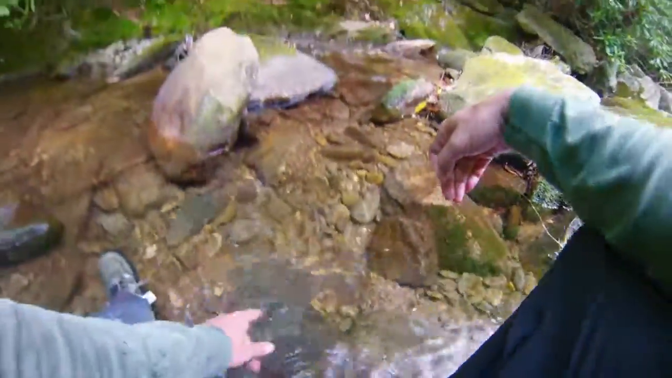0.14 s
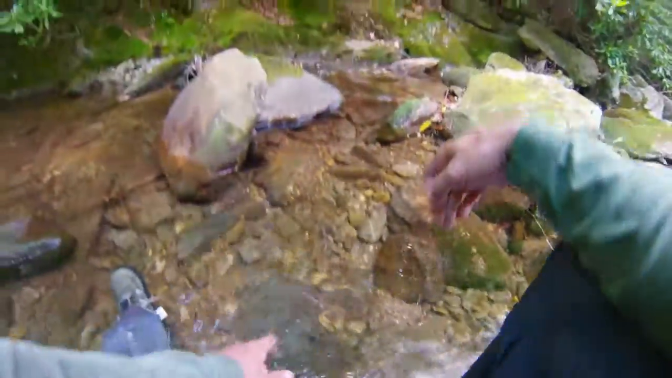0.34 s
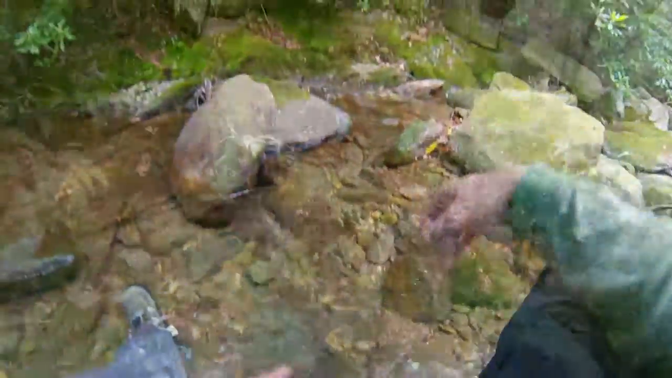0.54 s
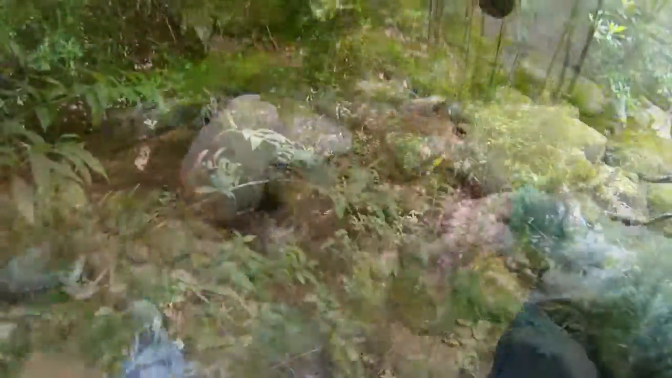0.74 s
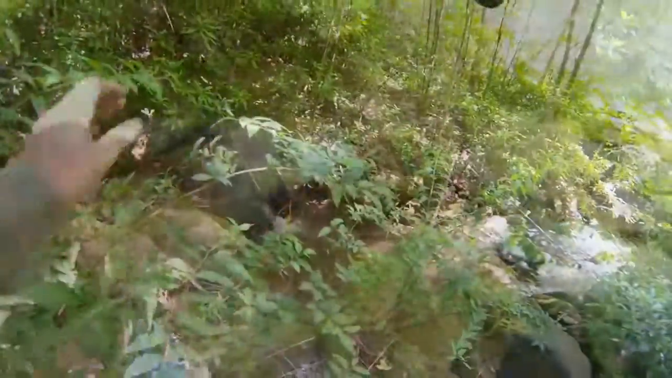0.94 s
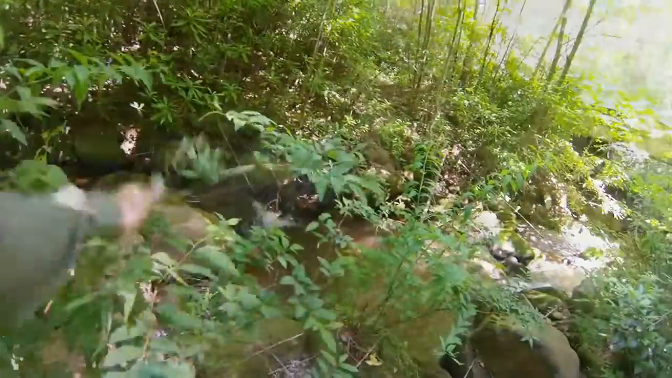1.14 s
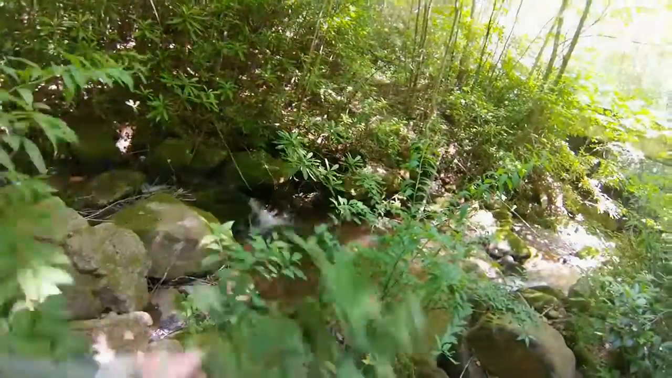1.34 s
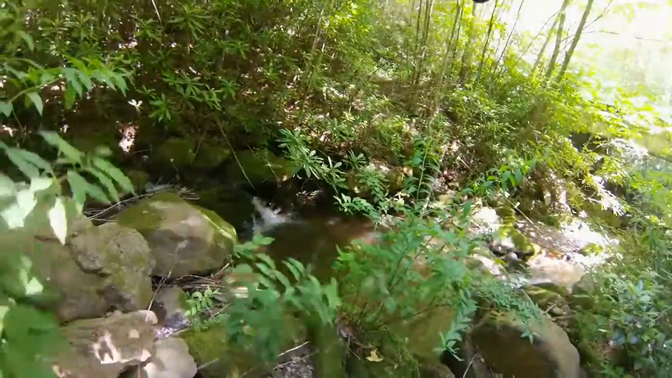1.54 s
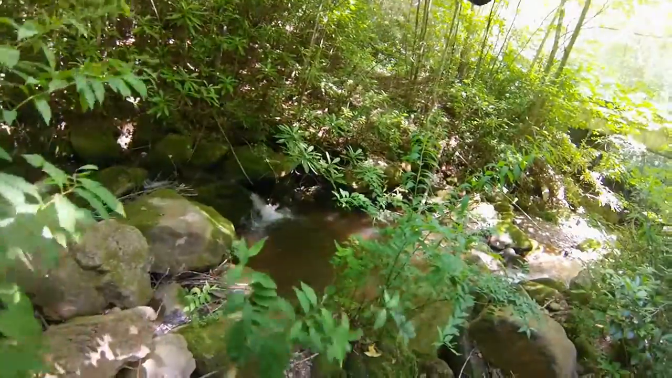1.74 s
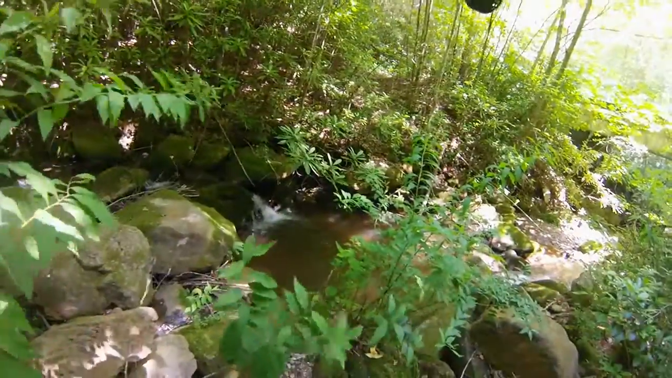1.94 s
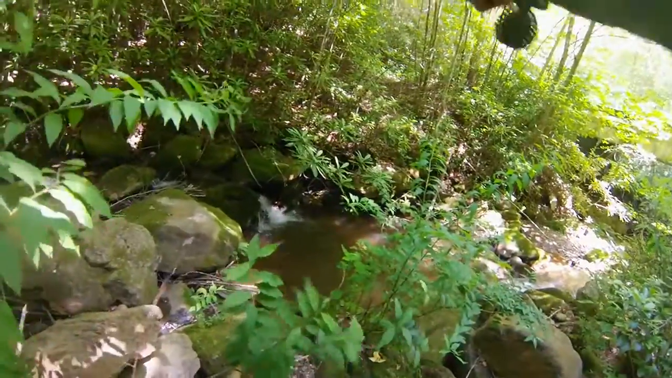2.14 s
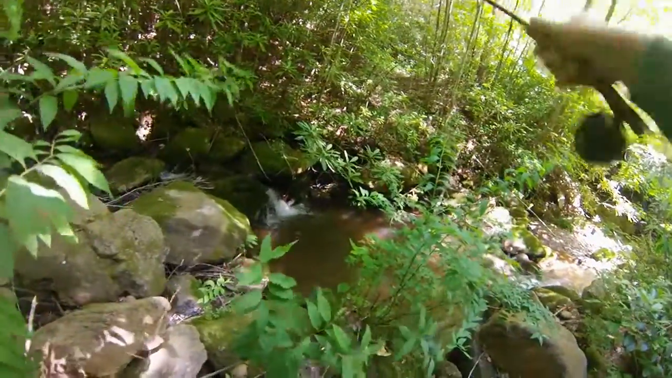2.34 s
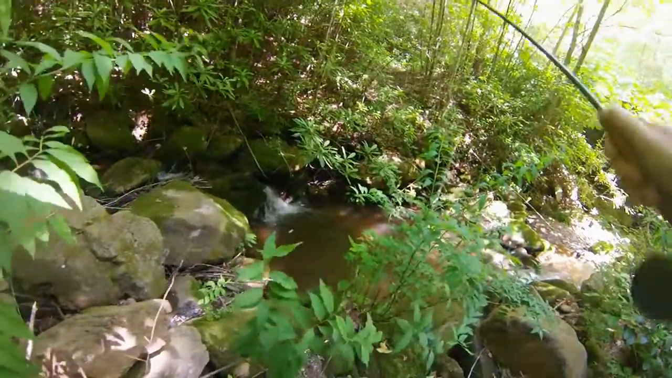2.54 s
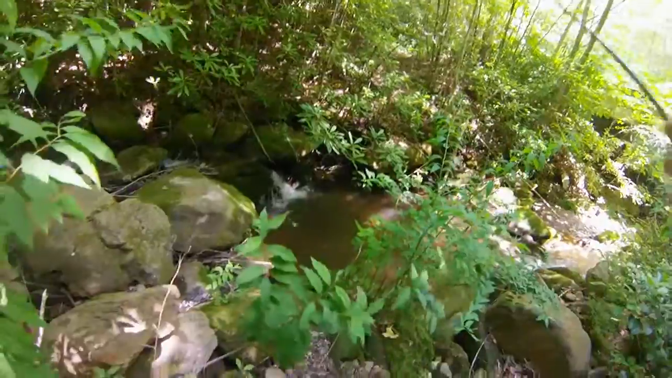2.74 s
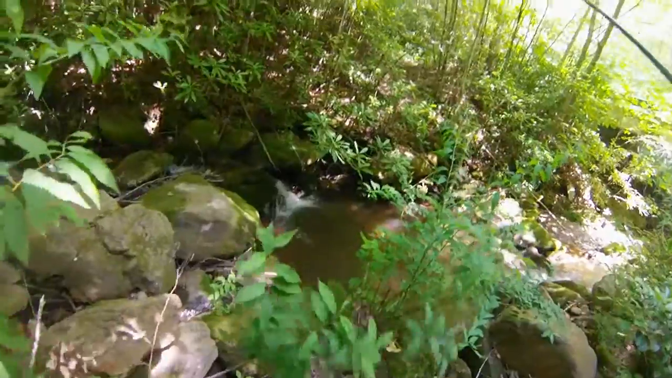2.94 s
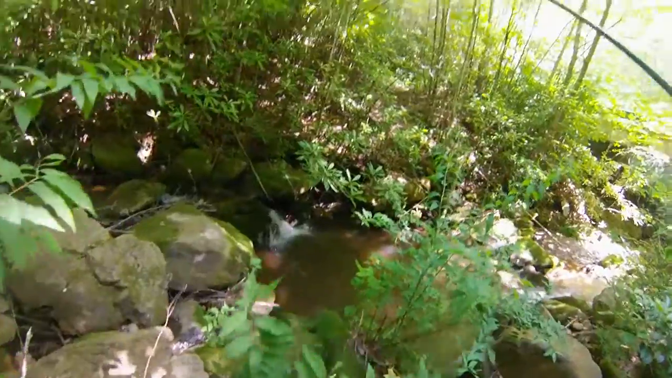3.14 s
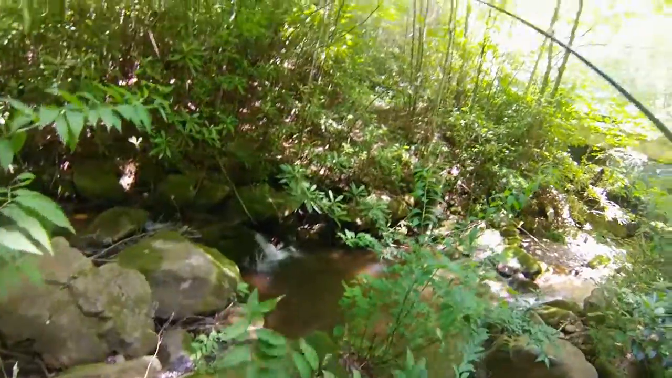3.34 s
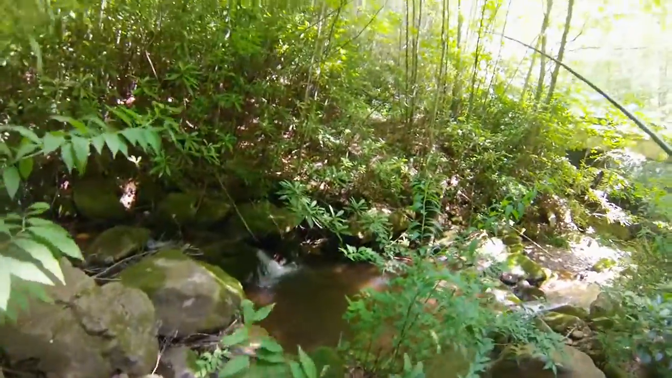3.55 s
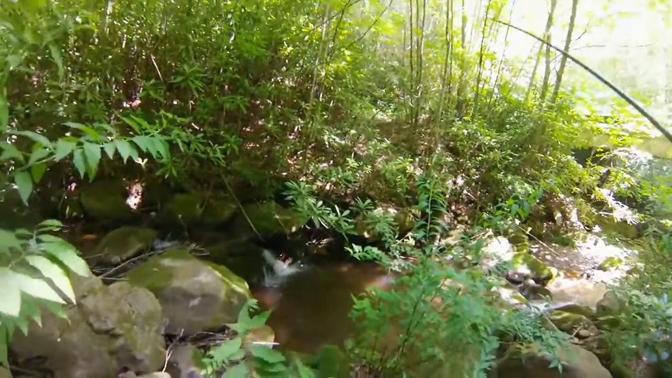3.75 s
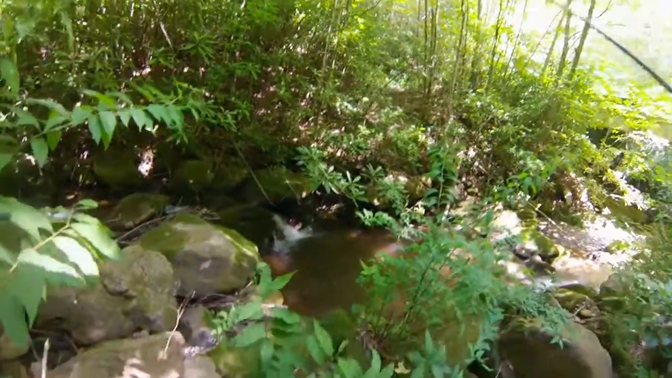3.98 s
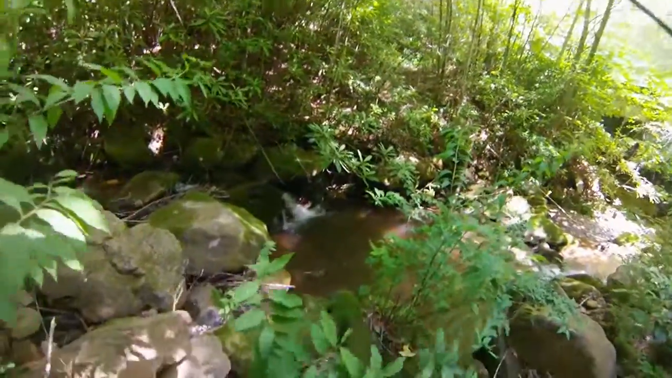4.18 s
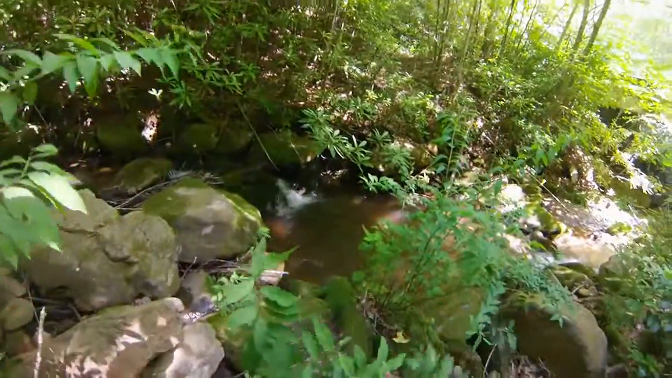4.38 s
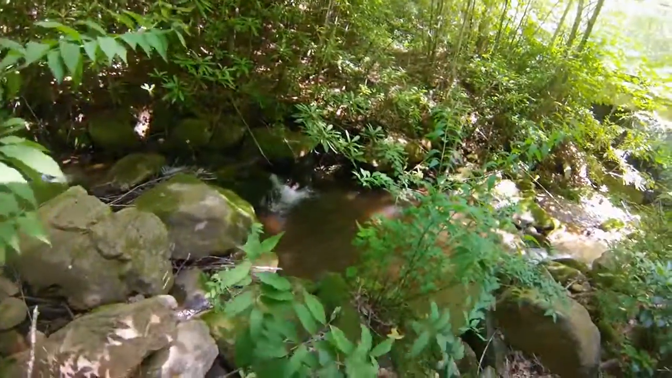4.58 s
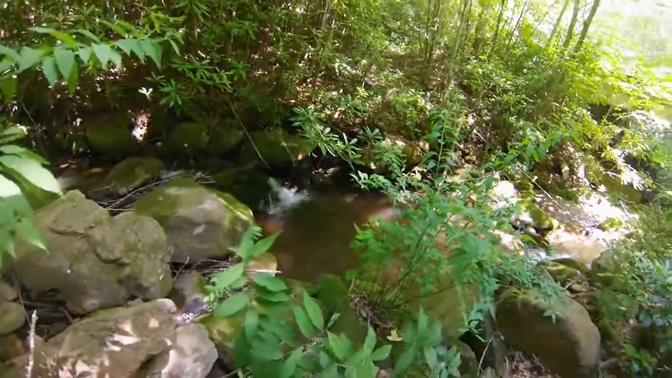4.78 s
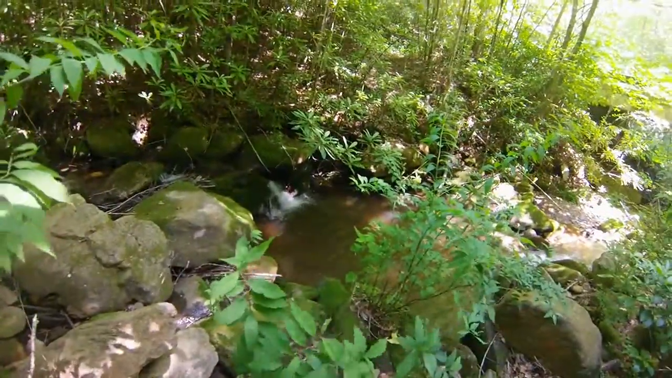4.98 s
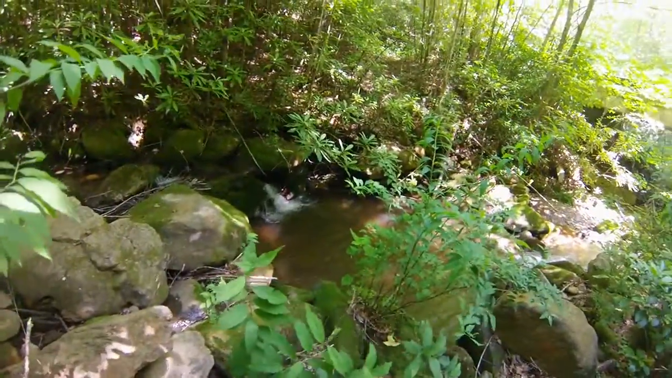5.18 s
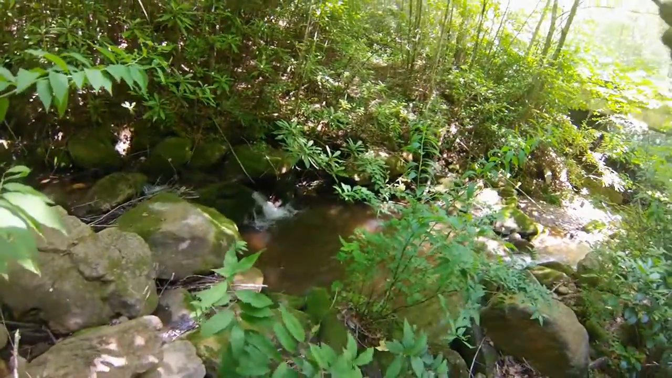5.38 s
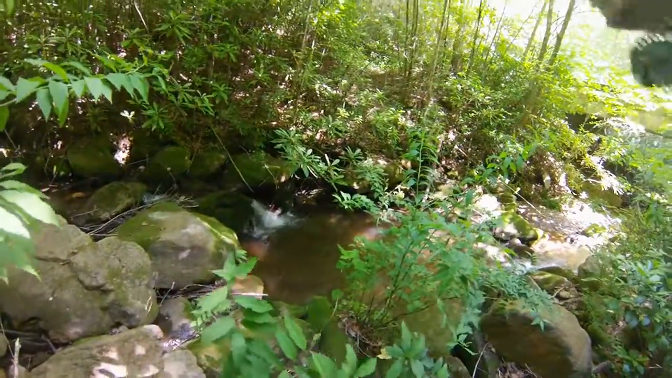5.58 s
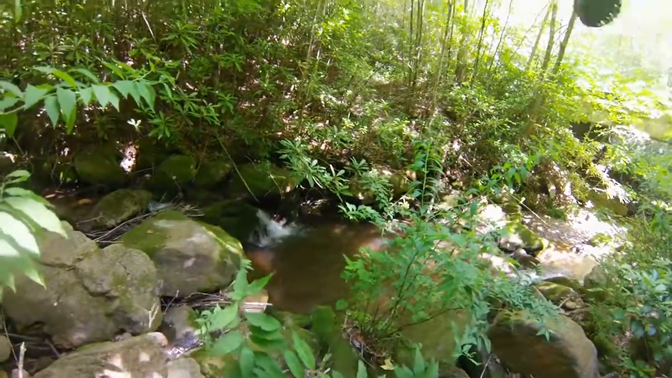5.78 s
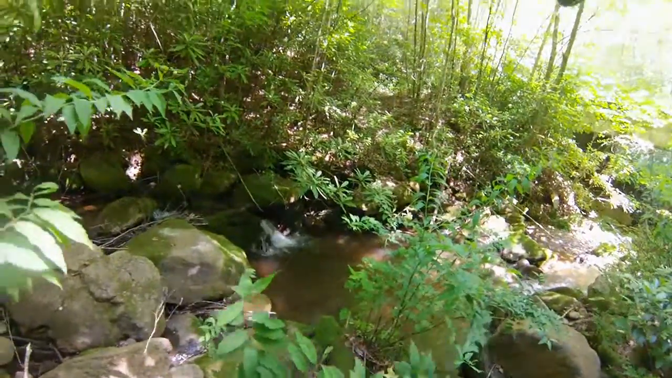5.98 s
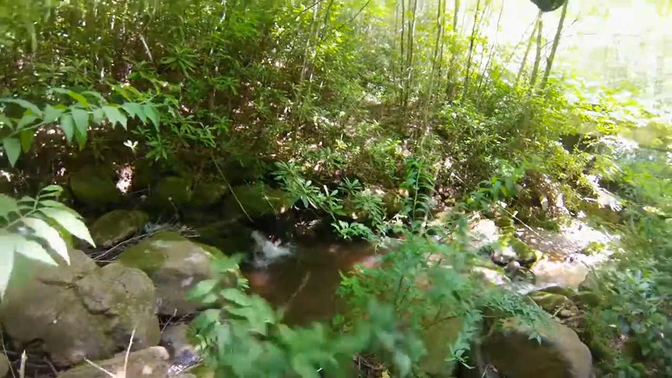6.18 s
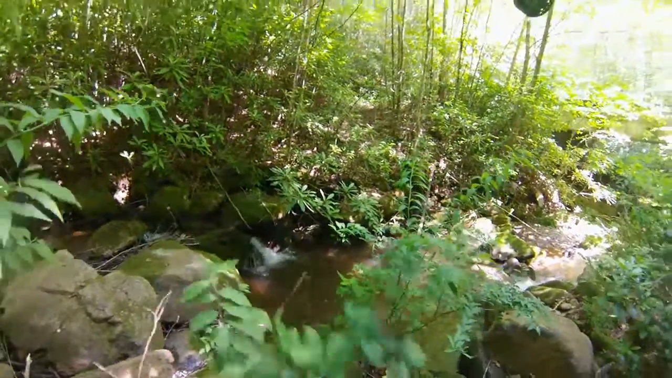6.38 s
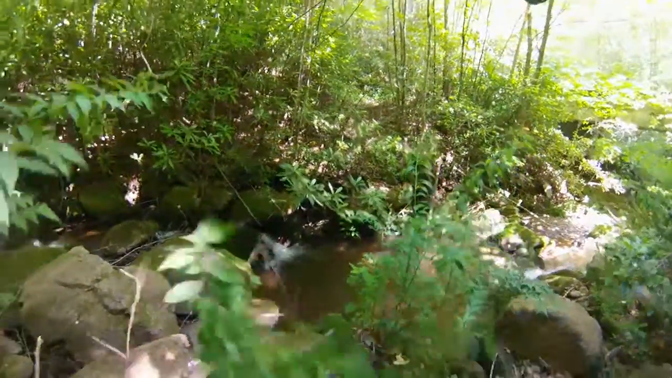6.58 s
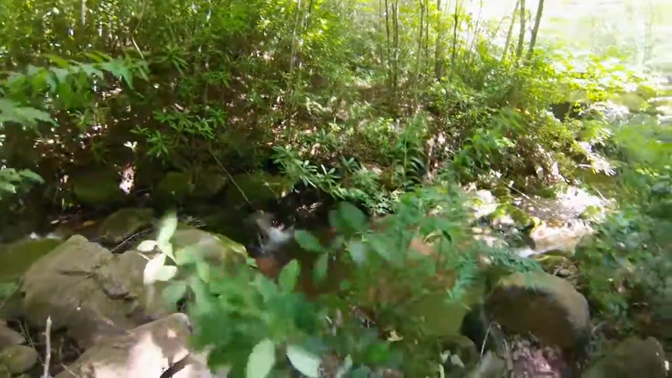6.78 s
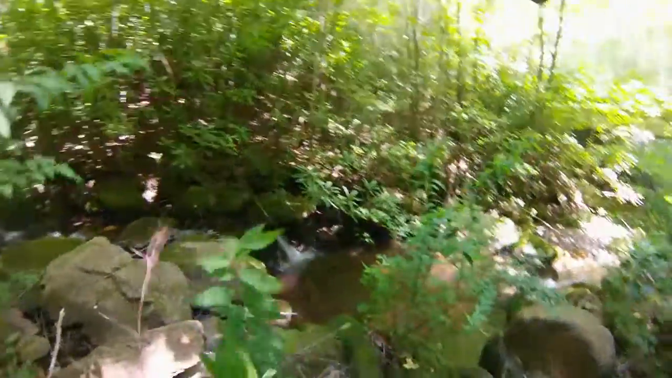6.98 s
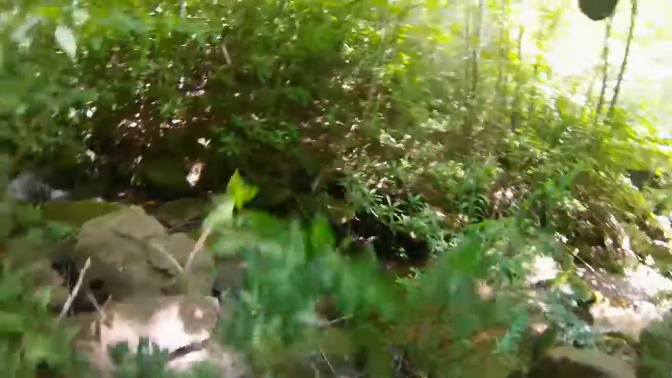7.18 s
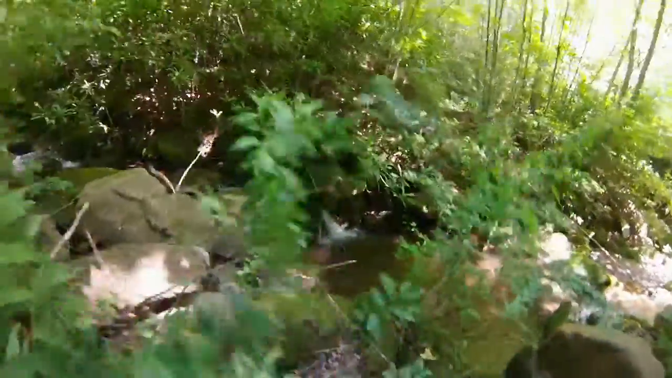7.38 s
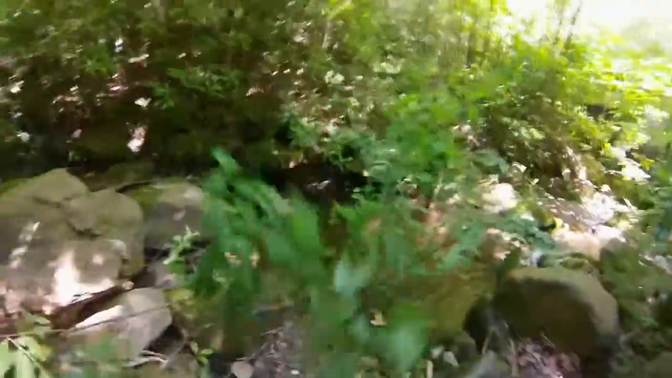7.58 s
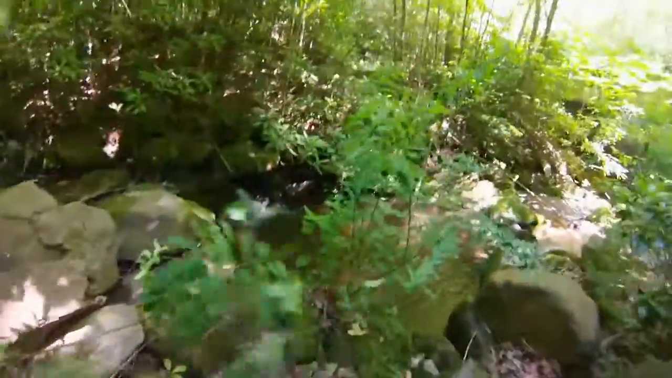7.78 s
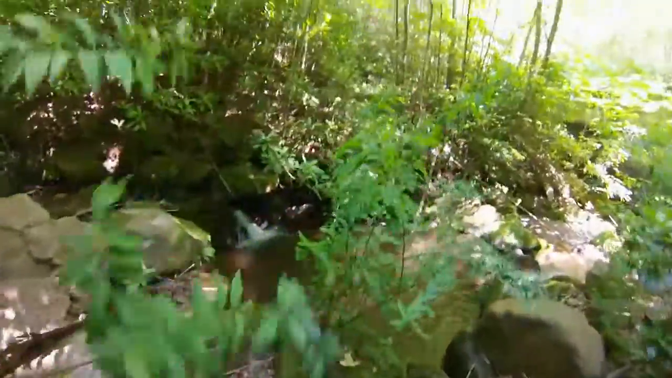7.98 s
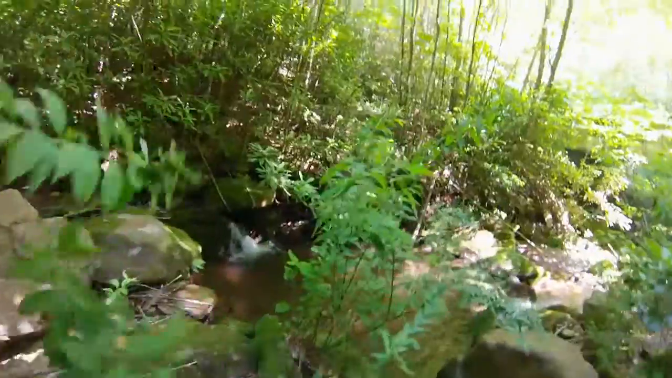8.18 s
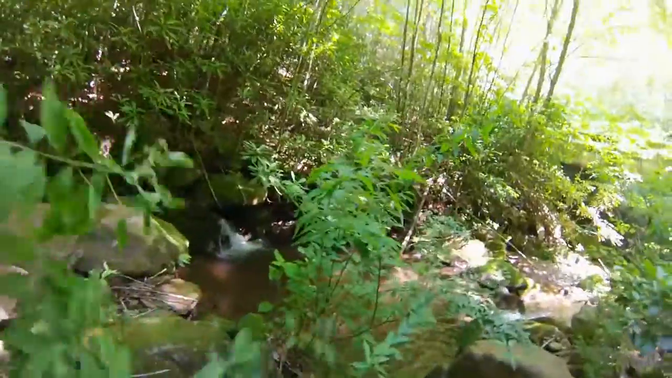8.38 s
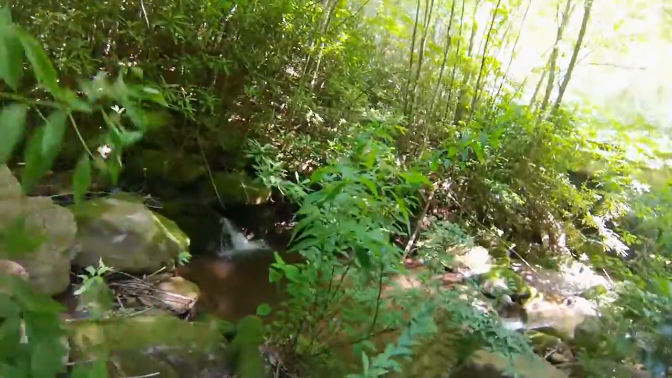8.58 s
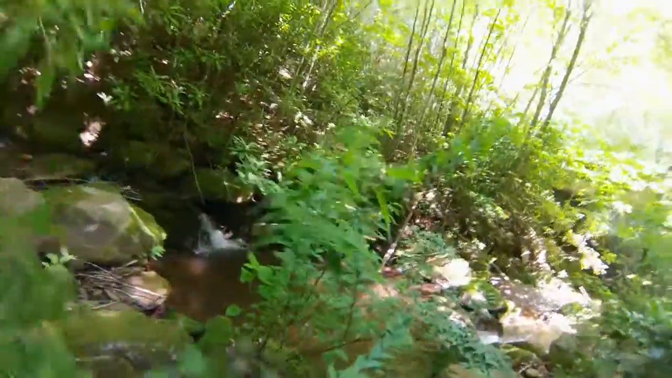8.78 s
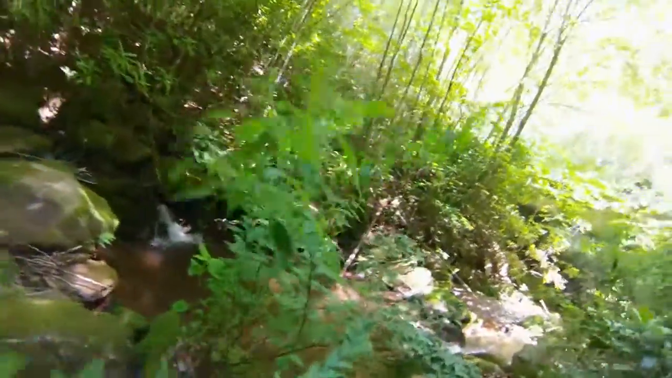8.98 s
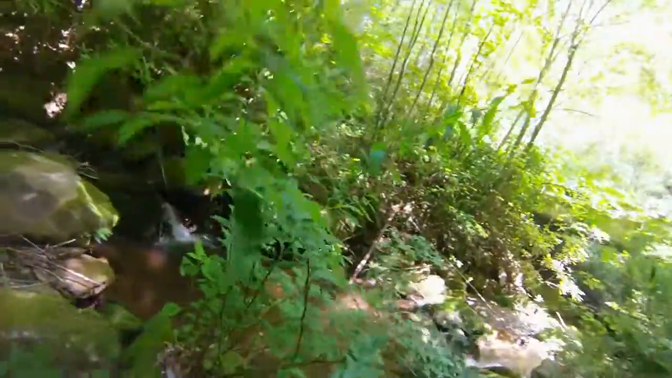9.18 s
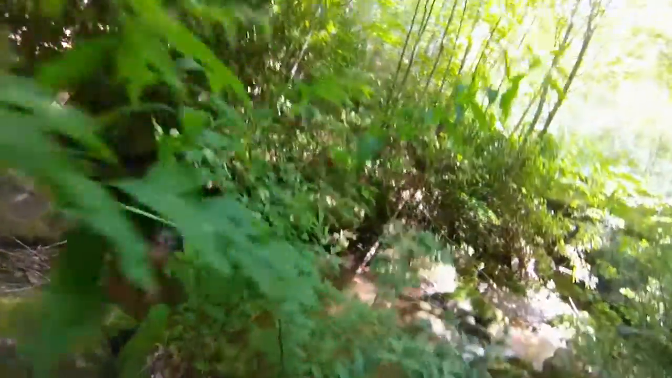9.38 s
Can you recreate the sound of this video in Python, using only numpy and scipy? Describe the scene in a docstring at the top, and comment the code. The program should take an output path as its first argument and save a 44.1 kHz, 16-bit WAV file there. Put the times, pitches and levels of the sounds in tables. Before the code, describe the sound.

At first only a faint shallow trickle is heard, with a cloth rub and small dull taps at the microphone. From about 0.5 to 1.4 seconds a small cascade fades in and then pours steadily into a rock pool, bubbly and slightly hollow, with fine spray. Raspy fabric strokes and thuds cluster from 1.5 to 3.5 seconds, with tiny dry ticks. Deep soft jolts follow around 3.7 to 5.2, with a rumble swell near 4 and sleeve brushes at 4 and 5.4. It is calmer until 6.4, when a few taps return. Around 7 to 7.6 cloth swishes and a heavy low surge peaks, then eases. Light taps come near 8; at 9.1 a firm dry knock and swish, then rubbing and rumble as it ends. Barely audible high insect chirps appear occasionally. The sound is close, mono, outdoors.

```python
"""Small mountain stream: a steady shallow trickle, joined within 1.4 s by a cascade pouring into a rock pool.
Water is shaped noise plus ringing bubbles, coloured by the resonances of a body-worn microphone case.
The wearer moves: cloth rubs, rasps and swishes; taps, jolts and air hit the case; twigs and gear tick.
These are shaped noise bursts and damped swings. A faint insect chirps in narrow-band noise."""
import sys
import numpy as np
from scipy import signal
from scipy.fft import rfft, irfft, next_fast_len
from scipy.io import wavfile
from scipy.ndimage import map_coordinates

SR = 44100
rng = np.random.default_rng(int(sys.argv[2]) if len(sys.argv) > 2 else 0)


def to_wav(s):
    """Save 16-bit WAV."""
    ch = np.atleast_2d(s).T  # columns
    pcm = np.round(np.clip(ch, -1, 1) * 32767)  # PCM
    wavfile.write(sys.argv[1], SR, pcm.astype(np.int16))


N = 415863

# Reference level of the cascade flow: [t/s, level/dB]
CASCADE_FLOW = [(.3, -66.5), (.5, -63.5), (1.05, -54), (1.4, -52), (9.43, -51.5)]
# Scraping strokes: [centre t/s, length/s, rasp level/dB, swish level/dB]
SCRAPE_STROKES = [(0.03, 0.45, -79, -65), (1.61, 0.14, -51, -59), (1.935, 0.087, -56.5, -64),
                  (2.31, 0.17, -54, -58.5), (2.49, .16, -61, -64), (3.14, 0.36, -63, -54.5),
                  (3.45, 0.18, -61.5, -59), (7.056, 0.19, -62, -56.5), (7.24, 0.11, -62, -61),
                  (7.483, 0.17, -56.5, -54.5), (9.119, 0.045, -62, -49.5), (9.3, 0.4, -60.5, -59.5)]
# Soft sleeve brushes: [centre t/s, length/s, level/dB]
SLEEVE_BRUSHES = [(0.177, 0.2, -55.5), (3.98, 0.093, -49), (4.089, 0.033, -43), (5.307, 0.11, -44.5),
                  (5.41, 0.18, -46), (5.583, 0.061, -47.5), (8.254, 0.32, -55), (9.351, 0.062, -43)]
# Taps on the case: [t/s, peak swing level/dB]
CASE_TAPS = [(0.162, -33), (0.181, -39), (0.434, -39), (1.337, -33.5), (1.404, -33.5), (1.678, -27.5),
             (1.816, -35.5), (2.282, -32), (2.358, -31), (2.378, -36), (2.768, -32), (2.781, -31),
             (3.323, -31), (3.357, -31.5), (3.616, -31.5), (4.16, -29.5), (4.520, -35.5), (4.683, -36),
             (4.795, -33.5), (4.94, -31.5), (5.040, -30.5), (6.442, -30), (6.557, -38), (7.882, -29.5),
             (8.054, -31), (9.068, -29.5)]
# Slow jolts of the body: [centre t/s, peak level/dB]
BODY_JOLTS = [(0.221, -34.5), (1.36, -42), (1.831, -32), (2.36, -30), (3.25, -27.5), (3.713, -24.5),
              (4.193, -22.5), (4.67, -24), (5.148, -30.5), (5.65, -35), (6.61, -31), (7.09, -25.5),
              (7.451, -25), (8.5, -31)]
# Ticks of twigs and gear: [t/s, peak level/dB, centre f/Hz, half-width/octaves, t60/s]
DRY_TICKS = [(1.600, -44, 2260, 0.12, 0.043), (2.031, -45, 6030, 0.21, 0.099),
             (2.083, -41, 2060, 0.084, 0.026), (2.377, -37, 1100, 0.62, 0.016),
             (2.770, -34.5, 2200, 0.17, 0.019), (2.823, -52, 5400, .08, .025), (3.055, -45, 6800, .17, .03),
             (5.067, -51, 5370, .1, .03), (6.704, -45, 6000, 0.93, 0.025), (7.770, -53, 10800, 0.09, .02),
             (8.056, -41, 1150, 0.72, .018), (9.068, -25.5, 650, 1.22, 0.02),
             (9.068, -45, 2600, 0.92, 0.0082)]
# Insect chirps: [centre t/s, level/dB]
INSECT_CHIRPS = [(.52, -75), (2.49, -72), (4.89, -70), (6.36, -68), (8.07, -71)]
# Case resonances: [centre f/Hz, Gaussian width/Hz, peak level/dB]
CASE_RESONANCES = [(561.5, 10, 5), (724, 44, 2.5), (1398, 160, 13), (2176, 109, 8.5), (2589, 115, 6),
                   (3877, 190, 4.5), (5380, 275, 6), (6240, 230, 4), (10030, 210, 2), (11260, 330, 5)]
# Cloth drags across the case: [start t/s, length/s, level/dB]
CLOTH_DRAGS = [(0.028, 0.19, -47.5), (0.572, 0.032, -50.5), (1.129, 0.17, -46.5), (1.515, 0.066, -45.5),
               (1.592, .08, -41.5), (1.875, 0.31, -47), (2.24, 0.29, -40.5), (2.54, 0.043, -43.5),
               (2.76, 0.041, -42.5), (2.878, 0.17, -46.5), (3.043, 0.33, -44.5), (3.43, 0.12, -47),
               (3.84, 0.16, -51), (5.304, 0.21, -45), (5.57, 0.057, -53.5), (6.251, .1, -47.5),
               (6.89, 0.17, -50.5), (7.186, 0.097, -43.5), (7.428, 0.13, -42), (7.616, 0.12, -48.5),
               (7.86, .08, -49.5), (8.103, 0.25, -46), (8.763, 0.47, -49.5), (9.08, 0.21, -50),
               (9.323, 0.071, -37)]
# Wearer's motion as slow pressure on the port: [t/s, level/dB]
BODY_MOTION = [(0, -44.5), (2.1, -48.5), (2.4, -39), (3.7, -40), (4.05, -29), (4.45, -42), (6.1, -44),
               (6.8, -29.5), (7.35, -25.5), (7.55, -17), (7.85, -38.5), (8.5, -37), (9.27, -25),
               (9.43, -25.5)]

# Spectral shapes ahead of the case, all [f/Hz, relative level/dB per Hz]
# Cascade body
POUR_SPECTRUM = [(40, -2), (200, 1.5), (400, -3.5), (620, -11), (950, -1.5), (1200, -1), (1550, -0.5),
                 (1800, -5), (2600, -8.5), (3400, -13), (6000, -32), (15000, -63)]
# Cascade spray
SPRAY_SPECTRUM = [(1000, -55), (2400, 3), (3300, -8), (4500, 0), (7200, 1.5), (8200, -4.5), (9300, -8),
                  (11500, -7.5), (13000, -11), (15300, -20.5)]
# Shallow run
SHALLOWS_SPECTRUM = [(60, -3.5), (400, 5), (900, -3), (1150, 1), (1420, -21), (1800, -5.5), (2200, -6),
                     (3200, -8.5), (4500, -10.5), (5400, -13.5), (7500, -11.5), (11300, -16), (15000, -17)]
# Air rumble at the port
AIR_SPECTRUM = [(15, -13), (30, 7.5), (42, -9), (60, -7), (100, -22), (300, -53), (1000, -83)]
# Slow heave of pressure
HEAVE_SPECTRUM = [(5, -8), (10, 0), (15, 0), (22, -8), (32, -24), (60, -48), (200, -95)]
# Low cloth rub
RUB_SPECTRUM = [(25, -3), (60, -1.5), (90, -1.5), (140, 1), (200, -9), (270, -13), (370, -23.5), (700, -33),
                (1500, -48), (5000, -71)]
# Rasp of a stroke
RASP_SPECTRUM = [(100, -24), (330, 3.5), (600, -4.5), (760, 0), (1000, -7), (1400, -24), (2500, -20),
                 (6000, -38), (15000, -44)]
# Swish of a stroke
SWISH_SPECTRUM = [(500, -37), (1400, -3.5), (2000, 9), (2800, -2), (4000, -9.5), (7000, -12), (15000, -39)]
# Soft sleeve
SLEEVE_SPECTRUM = [(60, -14), (150, -2.5), (250, 6.5), (310, -6), (400, -23), (1200, -58), (4000, -74)]

EASY_MOTION_DB = -39.5  # an easy shift of weight
AIR_DB, AIR_GROWTH_DB_PER_DB = -52.5, 0.5  # air rumble at easy motion; growth with motion
CREEP_DB, CREEP_GROWTH_DB_PER_DB = -58, 0.1  # cloth creeping between drags, likewise
GRIP_S, RELEASE_S = 0.021, 0.04  # a drag takes hold and lets go
PUFF_DB = -8.5  # air pushed by a drag, relative to its rub
TOP_HZ = 15290
TIME_S = np.arange(N) / SR


def amp(db):
    """Decibels to gain."""
    return 10 ** (np.asarray(db) / 20)


def unit(x):
    """Scale to rms 1."""
    return x / np.sqrt(np.mean(x ** 2) + 1e-20)


def noise():
    """White noise at nominal rms 1."""
    return rng.standard_normal(N)


def curve(rows):
    """Interpolate (s, value) rows to one value per sample."""
    return np.interp(TIME_S, *np.transpose(rows))


def wobble(knots_per_s):
    """Smooth random curve through normal-distributed knots."""
    knots = rng.standard_normal(int(N * knots_per_s / SR) + 4)
    return map_coordinates(knots, [np.arange(N) * knots_per_s / SR])


def swell(centre_s, length_s):
    """Bell-shaped envelope, length_s wide at 1/e."""
    return np.exp(-np.minimum((2 * (TIME_S - centre_s) / length_s) ** 2, 50))


def swells(rows):
    """Sum of bells from (centre s, length s, dB) rows."""
    return sum(amp(db) * swell(s, length_s) for s, length_s, db in rows)


def add(track, start_s, sound):
    """Mix a sound into the track in place."""
    part = track[max(round(start_s * SR), 0):][:len(sound)]
    part += sound[:len(part)]


def filtered(x, response):
    """Apply a gain that is a function of frequency."""
    size = next_fast_len(N + SR // 4)  # padded against wrap-around
    return irfft(rfft(x, size) * response(np.fft.rfftfreq(size, 1 / SR)), size)[:N]


def encased(x, spectrum):
    """Shape x by its own spectrum and the case's resonant peaks, at rms 1."""
    f_hz, level_db = np.transpose(spectrum)

    def response(hz):
        total_db = np.interp(np.log(hz + 1), np.log(f_hz), level_db)
        for centre_hz, width_hz, peak_db in CASE_RESONANCES:
            total_db = total_db + peak_db * np.exp(-0.5 * ((hz - centre_hz) / width_hz) ** 2)
        return amp(total_db)

    return unit(filtered(x, response))


def bubbles(per_s, low_hz, high_hz, cycles, spread_db, rise, samples):
    """Bubbles ring briefly, rising in pitch as they near the surface; a few are much stronger."""
    draws = rng.random((int(per_s * N / SR), 4))
    when, pitch, strength, life = draws.T[:, :, None]
    hz = low_hz * (high_hz / low_hz) ** pitch
    t = np.arange(samples) / SR
    age = t * hz / (cycles * (0.5 + life))  # in lifetimes
    ring = np.sin(2 * np.pi * hz * t * (1 + rise * np.minimum(age, 2) / 2))
    strength_db = spread_db * np.minimum(-np.log(1 - strength), 4.5)
    gain = amp(strength_db) * np.sqrt(hz / low_hz)
    decaying = gain * ring * np.exp(-np.pi * age)
    where = (when * N).astype(int) + np.arange(samples)
    return unit(np.bincount(where.ravel(), decaying.ravel(), N)[:N])


def stream():
    """Cascade body and spray share a surge of flow; a thin trickle runs beneath at constant level."""
    gurgle = bubbles(per_s=330, low_hz=439.6, high_hz=3305, cycles=16.2, spread_db=2.5, rise=0.15,
                     samples=1300)
    droplets = bubbles(per_s=1200, low_hz=2680, high_hz=13900, cycles=22, spread_db=2.5, rise=0.057,
                       samples=260)
    trickle = bubbles(per_s=260, low_hz=726, high_hz=8760, cycles=14, spread_db=1.5, rise=0.14,
                      samples=700)
    surge = wobble(7)  # more water: louder body and spray alike
    flow_db = curve(CASCADE_FLOW)
    body_db = flow_db + 0.4 + 0.53 * surge + 0.17 * wobble(24)
    spray_db = flow_db - 11.0 + 0.31 * surge + 0.73 * wobble(35)
    body = encased(noise() + amp(-14.5) * gurgle, POUR_SPECTRUM) * amp(body_db)
    spray = encased(noise() + amp(-9.5) * droplets, SPRAY_SPECTRUM) * amp(spray_db)
    shallows = encased(noise() + amp(-11.0) * trickle, SHALLOWS_SPECTRUM) * amp(-64)
    return body + spray + shallows


def dragging():
    """Gain of the drags: each grips, holds and lets go."""
    gain = np.zeros(N)
    for s, length_s, db in CLOTH_DRAGS:
        corners_s = [s - GRIP_S, s, s + length_s, s + length_s + RELEASE_S]
        gain += amp(db) * np.interp(TIME_S, corners_s, [0, 1, 1, 0])
    return gain


def following(easy_db, growth_db_per_db):
    """Gain that is easy_db at easy motion and grows as the wearer moves more."""
    return amp(easy_db + growth_db_per_db * (curve(BODY_MOTION) - EASY_MOTION_DB))


def buffeting():
    """Motion and dragged cloth push air at the port, over a slow heave; jolts add 30 Hz thumps."""
    air_gain = np.hypot(following(AIR_DB, AIR_GROWTH_DB_PER_DB), amp(PUFF_DB) * dragging())
    air = encased(noise(), AIR_SPECTRUM) * air_gain
    heave = encased(noise(), HEAVE_SPECTRUM) * amp(curve(BODY_MOTION))
    thumps = np.zeros(N)
    for s, db in BODY_JOLTS:
        thumps += amp(db) * swell(s, 0.043) * np.cos(2 * np.pi * 30 * (TIME_S - s))
    return air + heave + thumps


def friction(grain_db, knots_per_s):
    """Catch and slip: noise in small uneven bursts."""
    return unit(noise() * amp(grain_db * wobble(knots_per_s)))


def clothing():
    """Cloth drags as a low rub; harder strokes rasp and swish, a sleeve brushes softly."""
    rub_gain = np.hypot(following(CREEP_DB, CREEP_GROWTH_DB_PER_DB), dragging())
    rasp_gain = swells((s, length_s, db) for s, length_s, db, _ in SCRAPE_STROKES)
    swish_gain = swells((s, length_s, db) for s, length_s, _, db in SCRAPE_STROKES)
    rub = encased(friction(grain_db=2.5, knots_per_s=55), RUB_SPECTRUM) * rub_gain
    rasp = encased(friction(grain_db=4.0, knots_per_s=130), RASP_SPECTRUM) * rasp_gain
    swish = encased(friction(grain_db=3.0, knots_per_s=110), SWISH_SPECTRUM) * swish_gain
    sleeve = encased(friction(grain_db=3.0, knots_per_s=70), SLEEVE_SPECTRUM) * swells(SLEEVE_BRUSHES)
    return rub + rasp + swish + sleeve


def taps(thud_hz, t60_s, attack_s, contact_db):
    """Each tap swings the heavily damped mount, with a faint dry contact noise."""
    out, t = np.zeros(N), np.arange(SR // 10) / SR
    dull = signal.butter(2, [300, 1600], "bandpass", fs=SR, output="sos")
    for s, db in CASE_TAPS:
        hz = thud_hz * np.exp(rng.normal(0, 0.047))
        swing = np.sin(2 * np.pi * hz * t) * amp(-60 * t / t60_s) * (1 - np.exp(-t / attack_s))
        contact = signal.sosfilt(dull, rng.standard_normal(len(t))) * amp(-60 * t / 0.046)
        tap = swing / np.abs(swing).max() + amp(contact_db) * contact / np.abs(contact).max()
        add(out, s, amp(db) * tap)
    return out


def ticks():
    """Short dry cracks: a dying noise burst excites each object's own band."""
    out, t = np.zeros(N), np.arange(SR // 10) / SR
    for s, db, centre_hz, octaves, t60_s in DRY_TICKS:
        edges_hz = np.minimum(centre_hz * 2.0 ** np.array([-octaves, octaves]), SR / 2 - 1)
        band = signal.butter(2, edges_hz, "bandpass", fs=SR, output="sos")
        crack = signal.sosfilt(band, rng.standard_normal(len(t)) * amp(-60 * t / t60_s))
        add(out, s, amp(db) * crack / np.abs(crack).max())
    return out


def insect(pitch_hz, width_hz, length_s):
    """Thin, very high chirps: narrow-band noise under short bells."""
    tone = unit(filtered(noise(), lambda hz: np.exp(-((hz - pitch_hz) / width_hz) ** 2)))
    return tone * swells((s, length_s, db) for s, db in INSECT_CHIRPS)


def scene():
    """Sum of water, handling close by and a faint insect, one channel."""
    knocks = taps(thud_hz=120.5, t60_s=0.028, attack_s=0.0016, contact_db=-17.5) + ticks()
    handling = buffeting() + clothing() + knocks
    chirps = insect(pitch_hz=11240, width_hz=150, length_s=0.032)
    return (stream() + handling + chirps)[None]


def record(dry):
    """Band limit: nothing passes at or above TOP_HZ."""
    return filtered(dry[0], lambda hz: hz < TOP_HZ)[None]


dry = scene()
out = record(dry)
to_wav(out)
```